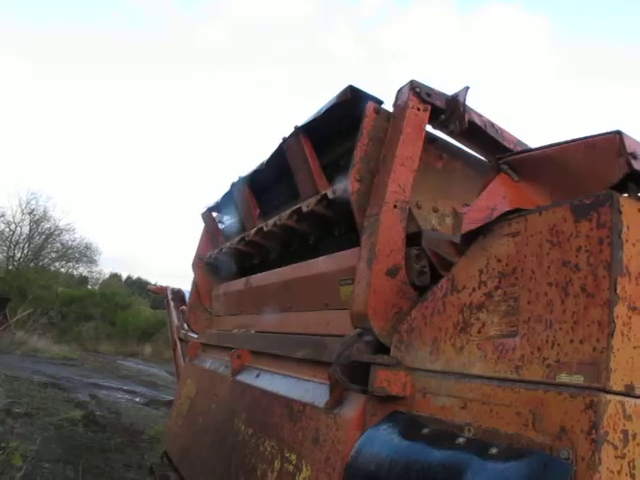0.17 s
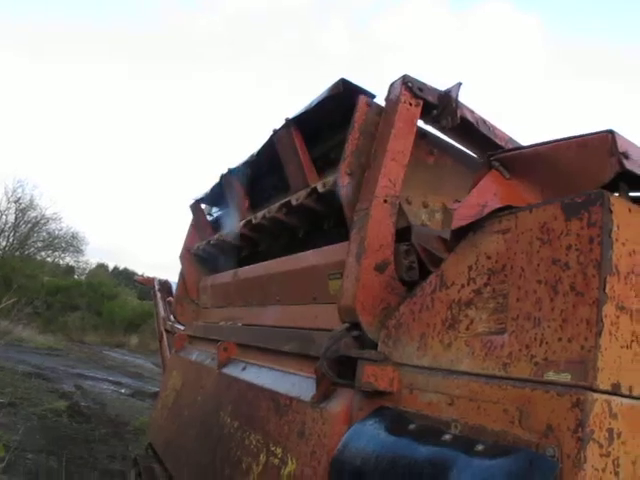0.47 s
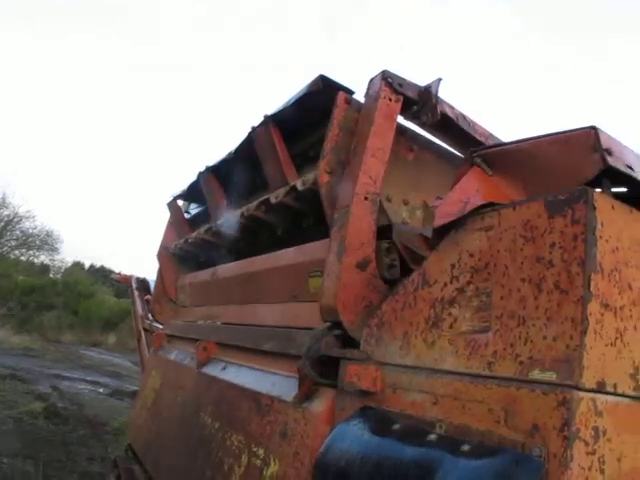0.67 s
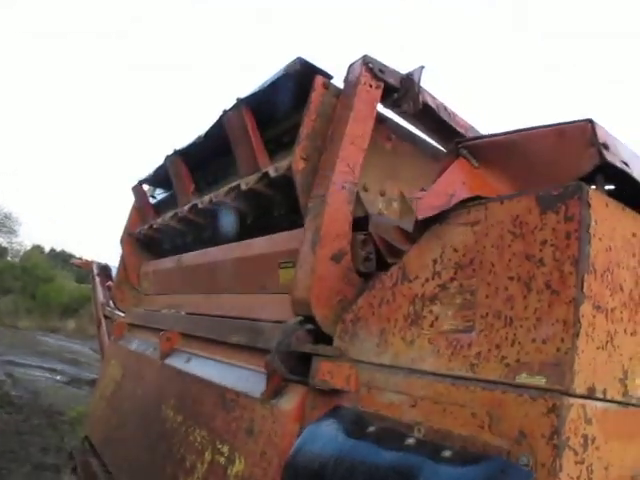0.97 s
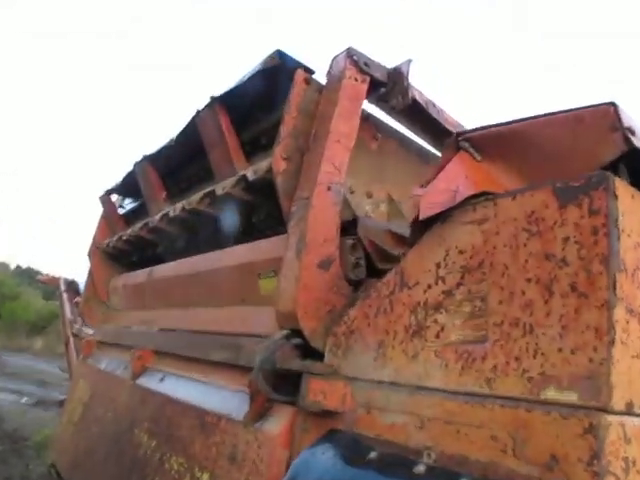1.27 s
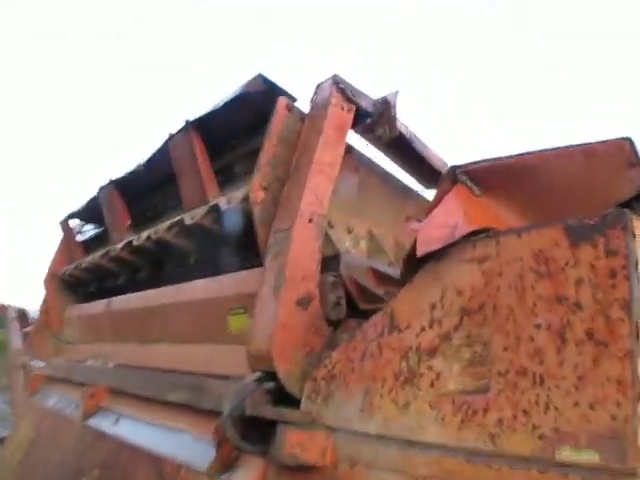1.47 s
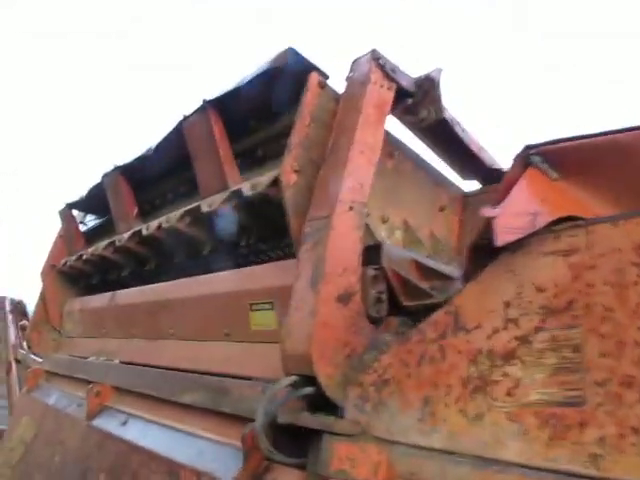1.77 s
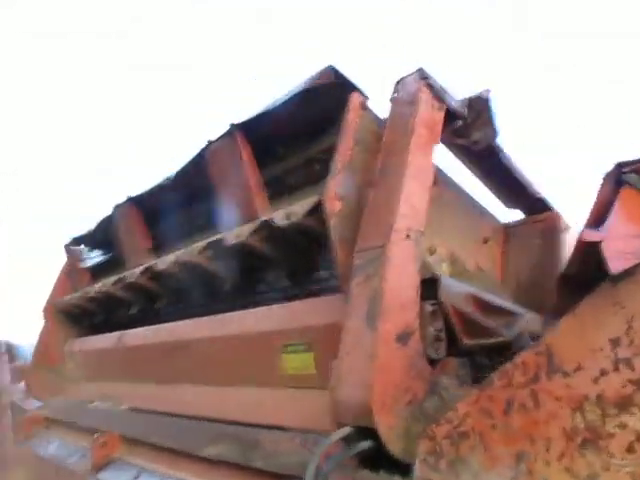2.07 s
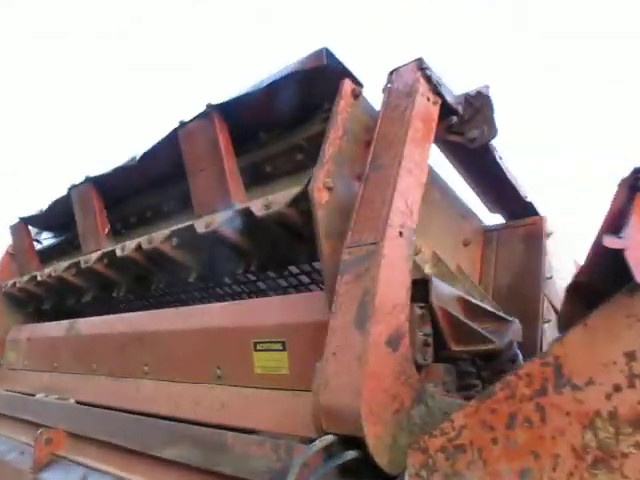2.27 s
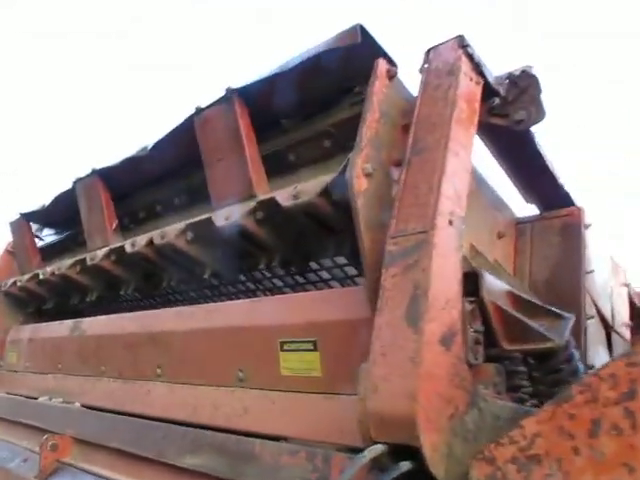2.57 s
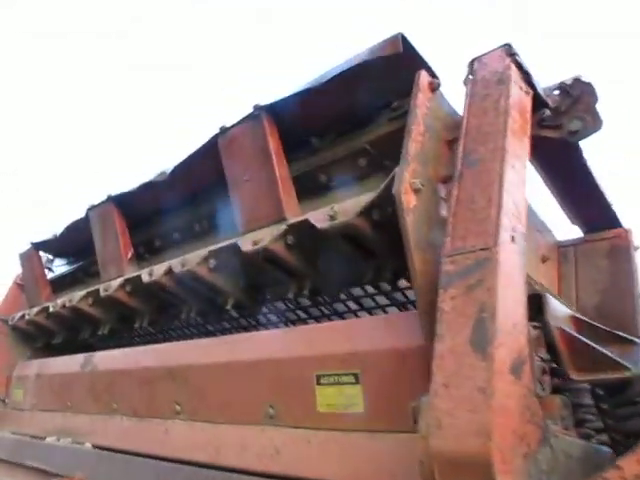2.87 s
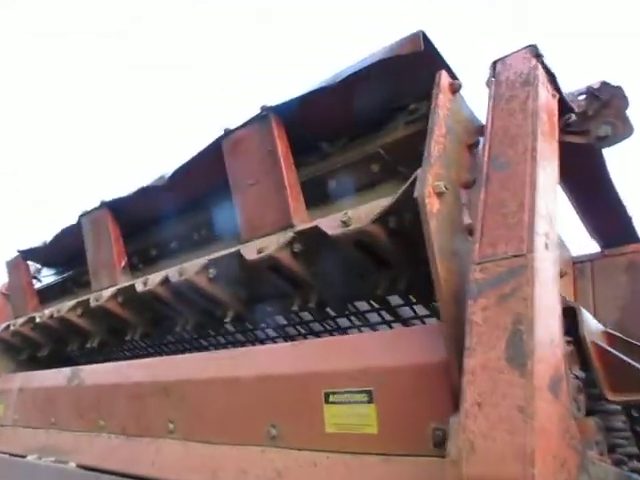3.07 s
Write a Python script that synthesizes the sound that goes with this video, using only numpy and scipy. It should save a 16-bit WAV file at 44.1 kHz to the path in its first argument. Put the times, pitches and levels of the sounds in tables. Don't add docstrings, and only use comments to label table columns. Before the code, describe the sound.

A heavy diesel engine throbs throughout, uneven pulses about sixteen a second under broad casing roar and fan hiss. A click and brief louder burst open it at 0.07 s. Faint dull rattles come until 1.5 s, when the fan eases; from 1.6 s bright mesh-and-frame rattling, about fourteen a second, comes closer, strongest around 2.3-3.2 s, with humming sheets and high metallic pings, sharpest near 2.1, 2.7 and 3.19 s. Dry, open air.

```python
import sys
import numpy as np
from scipy import signal
from scipy.fft import rfft, irfft, next_fast_len
from scipy.io import wavfile
from scipy.ndimage import uniform_filter1d, map_coordinates

SR = 44100
rng = np.random.default_rng(int(sys.argv[2]) if len(sys.argv) > 2 else 0)


def rack_gain(trim_db):
    fader = np.asarray(trim_db, float)
    return 10 ** (fader / 20)


def unload_wav(signal):
    wavfile.write(
        sys.argv[1],
        SR,
        np.round(np.clip(np.atleast_2d(signal).T, -1, 1) * 32767).astype(np.int16),
    )


N = 142002


def unit(x):
    return x / np.sqrt(np.mean(x ** 2) + 1e-20)


def curves(rows):
    s, *cols = np.transpose(rows)
    return [np.interp(np.arange(N) / SR, s, c) for c in cols]


def wobble(rate):
    s = np.arange(0, N + 64, 64)
    knots = rng.standard_normal(300)
    return np.interp(np.arange(N), s, map_coordinates(knots, [s * rate / SR]))


def angle(rates, zero_s):
    turns = np.cumsum(curves(rates)[0]) / SR
    return 2 * np.pi * (turns - turns[round(zero_s * SR)])


def coloured(x, points, lifts=()):
    m = next_fast_len(N + 8192)
    hz = np.fft.rfftfreq(m, 1 / SR)
    f, db = np.transpose(points)
    bells = sum(lift_db / (1 + (2 * (hz - c) / w) ** 2) for c, w, lift_db in lifts)
    response = rack_gain(np.interp(np.log(hz + 1), np.log(f), db) + bells)
    return unit(irfft(rfft(x, m) * response, m)[:N])


def patchy(depth_db):
    z = signal.stft(rng.standard_normal(N), nperseg=512)[2]
    field = rng.standard_normal(z.shape)
    field = uniform_filter1d(uniform_filter1d(field, 8, 0), 8, 1)
    return signal.istft(z * rack_gain(depth_db * unit(field)), nperseg=512)[1][:N]


def narrow(hz, rate):
    a = 2 * np.pi * np.cumsum(hz + np.zeros(N)) / SR
    return unit(wobble(rate) * np.cos(a) + wobble(rate) * np.sin(a))


def struck(rows):
    power = np.zeros(N + SR)
    t = np.arange(SR // 3) / SR
    for s, db, rise, hold, t60 in rows:
        decay = rack_gain(db - 60 * np.maximum(t - hold, 0) / t60)
        power[round(s * SR):][:len(t)] += (decay * (1 - np.exp(-t / rise))) ** 2
    return np.sqrt(power[:N])


def clatter(drive, low_hz, t60):
    rings_per_s = 1400
    start, pitch, size, life = rng.random((4, round(rings_per_s * N / SR)))
    at = (start * N).astype(int)
    t = np.arange(round(.7 * t60 * SR)) / SR
    tones = np.sin(2 * np.pi * (low_hz * 8 ** pitch)[:, None] * t)
    rings = tones * rack_gain(-60 * t / (t60 * (0.21 + life))[:, None])
    rings *= (drive[at] * rack_gain(11 * size ** 4))[:, None]
    return np.bincount((at[:, None] + np.arange(len(t))).ravel(), rings.ravel(), N + len(t))[:N]


# time in seconds, low sheet pitch in Hz, low sheet level in dB,
# high sheet level in dB.
PANELS = [(.1, 818, -39, -50), (.7, 825, -36, -49), (.85, 804, -45, -49), (1.3, 813, -41, -44),
          (1.55, 800, -40, -52), (1.8, 850, -35, -40), (2.0, 848, -50, -46), (2.15, 836, -33, -36),
          (2.5, 840, -42, -41), (2.8, 823, -38, -40), (3.05, 830, -59, -38), (3.2, 830, -55, -38)]


def panels():
    high_hz, sways_per_s = 942, 48
    low_hz, low_db, high_db = curves(PANELS)
    return rack_gain(low_db) * narrow(low_hz, sways_per_s) + rack_gain(high_db) * narrow(high_hz, sways_per_s)


# start in seconds, peak level in dB, singing time in seconds, T60 in seconds.
PIN = [(1.299, -40, .01, .1), (1.33, -43, .035, .08), (1.716, -54, 0.0082, .08), (2.136, -39, .012, .06),
       (2.267, -52, .02, .08), (2.405, -40, .01, .08), (2.577, -42, 0.0086, .06), (2.664, -42, .02, .08),
       (3.077, -31, .006, .06), (1.574, -34, .03, .1), (1.783, -43, .03, .1), (1.865, -35, .005, .14),
       (1.993, -38, 0.052, .1), (2.083, -20.5, 0.0033, 0.02), (2.208, -35, 0.018, .1),
       (2.335, -52, 0.023, .15), (2.491, -47, .01, .1), (2.596, -41, 0.0081, .1),
       (2.692, -23.5, 0.0078, 0.12), (2.844, -45, .01, .1), (2.923, -28, 0.008, 0.05),
       (2.94, -37, .02, .06), (3.047, -29.5, 0.09, 0.04), (3.139, -26, .005, 0.037),
       (3.187, -19.5, 0.0054, 0.16)]
# start in seconds, pitch in Hz, peak level in dB, T60 in seconds.
PINGS = [(.45, 7250, -38, .1), (.46, 8800, -41, 0.086), (.61, 8940, -43, .08), (.705, 4630, -42, .06),
         (1.12, 8800, -40, .06), (1.33, 9920, -45, 0.11), (1.782, 4700, -32, .03), (1.778, 10100, -59, .1),
         (1.053, 8850, -43, .05), (1.268, 8800, -44, .06), (1.276, 7700, -43, .06), (1.492, 8800, -46, .04),
         (1.562, 8900, -45, 0.061), (1.575, 7700, -48, .05), (1.702, 8800, -50, 0.062),
         (2.058, 11200, -43, 0.067), (2.424, 8700, -46, 0.06), (2.487, 8800, -46, .06),
         (2.545, 8800, -47, .06), (2.548, 11200, -52, .06), (2.596, 9920, -48, .12),
         (2.703, 3710, -28, 0.085), (2.838, 3470, -36, .06), (1.923, 3210, -28, .06),
         (2.232, 3380, -29, .04), (1.918, 8750, -42, 0.072), (1.995, 7700, -42, .1),
         (2.085, 4560, -31, 0.044), (2.697, 8900, -38, 0.042), (2.825, 10900, -48, .06),
         (2.867, 7700, -40, .07), (2.93, 14240, -67, .2), (3.082, 9800, -49, .1), (3.162, 8850, -43, 0.068),
         (3.188, 9920, -31.5, 0.037), (3.188, 11100, -45, .08), (3.188, 7700, -41, 0.068),
         (3.188, 14240, -56, .15)]
PITCH_DRIFT = .75


def small_parts():
    pin_hz, hum_db = 5941, -54
    t = np.arange(N) / SR
    near_db = curves(WALK)[4]
    sings = struck([(s, db - 5.5, .0007, hold, t60) for s, db, hold, t60 in PIN])
    sings += rack_gain(hum_db + near_db + 7.4 * wobble(25))
    drift = PITCH_DRIFT * (wobble(30.03) + wobble(90))
    pin = sings * rack_gain(3.5 * np.tanh(wobble(90))) * np.sin(2 * np.pi * pin_hz * t + drift)
    pin += sings * rack_gain(-17) * narrow(pin_hz, 90)
    cracks = struck([(s, db - 7, .0007, 0, .04) for s, db, hold, t60 in PIN])
    cracks = cracks * coloured(rng.standard_normal(N), MESH)
    pings = sum(struck([(s, db, .001, .005, t60)]) * np.sin(2 * np.pi * hz * t + PITCH_DRIFT * wobble(90))
                for s, hz, db, t60 in PINGS)
    return pin + cracks + pings


# time in seconds, throws per second.
SHAKE = [(.1, 13.4), (.7, 13.5), (1.65, 14), (2.5, 14.3), (3.2, 14.4)]
# multiple of the throw rate, level in dB rms.
SHAKE_ORDERS = [(1, -31), (2, -47), (3, -41), (4, -42)]


def box_pump():
    near_db = curves(WALK)[4]
    a = angle(SHAKE, zero_s=1.63)
    return sum(rack_gain(db + 3 + .3 * k * near_db + .3 * k * wobble(1.5)) * np.cos(k * a) for k, db in SHAKE_ORDERS)


# start in seconds, peak level in dB.
FAR_RATTLES = [(0.2433, -31.5), (0.3277, -30), (0.4094, -26), (0.5654, -30), (0.6154, -29.5), (0.6914, -27),
               (0.7744, -33), (0.9144, -27), (1.0524, -31), (1.2052, -30.5), (1.2744, -31), (1.3494, -28.5),
               (1.4194, -29), (1.4934, -26.5), (1.5484, -29.5)]
# start in seconds, peak level in dB, frame level over it in dB.
RATTLES = [(1.6344, -34, 5.5), (1.7037, -32, 1), (1.7381, -32.5, -13), (1.7743, -30, 4.5),
           (1.844, -29, 4.5), (1.9198, -29.5, -8), (1.987, -32.5, 9.5), (2.0572, -29, 5),
           (2.1256, -27.5, -1), (2.195, -30, 0.5), (2.267, -29, -0.5), (2.3359, -29, 3.5), (2.4037, -28, 0),
           (2.4435, -52, -2), (2.4797, -31, 7), (2.545, -31.5, 4.5), (2.6124, -36, 7), (2.657, -32.5, -7),
           (2.6905, -29, 4.5), (2.7533, -31.5, -2), (2.8235, -32, 8), (2.893, -32.5, 11),
           (2.9673, -29.5, 1.5), (3.031, -27, 1), (3.106, -29.5, 0), (3.138, -46, 0), (3.1705, -31, 5.5)]
# start in seconds, peak level in dB.
TAPS = [(1.1765, -38), (1.6785, -37), (1.8182, -41), (2.0276, -36), (2.2403, -35), (2.3076, -37),
        (2.4978, -36), (2.52, -33), (2.8718, -37), (2.9203, -35), (3.003, -36)]
# frequency in Hz, density in dB per Hz.
MESH = [(1500, -40), (3500, 6), (5000, 4.5), (8000, -3), (10500, -4.5), (12500, -26), (16000, -43)]
# frequency in Hz, density in dB per Hz.
FRAME = [(500, -29), (1200, -4.5), (2000, -2), (3200, -6), (4500, -13.5), (7000, -61)]


def rattles():
    mesh_db, frame_lag_s = -5.5, 0.0088
    near_db = curves(WALK)[4]
    hits = [(s, db - 5.5, 5) for s, db in FAR_RATTLES] + list(RATTLES)
    blows = [(s, db + mesh_db, 0.002, .006, 0.13) for s, db, frame_db in hits]
    snaps = [(s, db - 3, .0004, .001, 0.017) for s, db, frame_db in RATTLES]
    taps = [(s, db + mesh_db, .0006, .004, 0.05) for s, db in TAPS]
    mesh = struck(blows + snaps + taps)
    frame = struck([(s + frame_lag_s, db + frame_db - 1, 0.0052, .012, 0.12) for s, db, frame_db in hits])

    grit = patchy(depth_db=1.5) * rack_gain(2.3 * unit(uniform_filter1d(rng.standard_normal(N), size=40)))
    wires = clatter(unit(mesh) + 0.46 * rack_gain(.5 * near_db), low_hz=1516, t60=.012)
    wires = coloured(wires, [(1200, -27), (2500, -4.5), (6000, -3.0), (11000, -17.5), (16000, -40)])
    knocks = clatter(unit(frame) + 1.8, low_hz=448.3, t60=.06)
    ringing = mesh * coloured(grit, MESH) + frame * coloured(patchy(depth_db=-0.5), FRAME)
    return ringing + rack_gain(-37) * unit(knocks) + rack_gain(-46.5) * wires


# frequency in Hz, density in dB per Hz.
ROAR = [(30, -8), (50, -8), (80, -17), (150, -8.5), (240, -8.5), (380, -11), (900, -14.5), (2000, -16.5)]
# centre in Hz, width in Hz, lift in dB.
CASING = [(294, 14, 4), (458, 32, 2), (816, 79, 4), (946, 54, 4), (1990, 760, 1), (2890, 30, 4.5)]
# frequency in Hz, density in dB per Hz.
HISS = [(1200, -17), (2800, 0), (4000, -6), (6000, -10.5), (10000, -17), (12000, -26), (14500, -42),
        (16000, -56)]


def casing_and_fan():
    _, _, roar_db, fan_db, _ = curves(WALK)
    a = angle(CYCLE, STRONG_FIRING_S)
    swing_db = 0.49 * wobble(5.17) + .5 * wobble(24.99) + 0.53 * np.cos(4 * a) + 0.28 * np.cos(a)
    roar = coloured(patchy(depth_db=0.5), list(ROAR) + [(4500, -36.5), (9000, -64)], CASING)
    hiss = coloured(patchy(depth_db=0.53), [(300, -60)] + list(HISS), CASING)
    hiss_db = -34.5 + fan_db + 0.99 * wobble(17.0)
    return rack_gain(swing_db) * (rack_gain(-24.5 + roar_db) * roar + rack_gain(hiss_db) * hiss)


# time in seconds, cycles per second.
CYCLE = [(.1, 16.54), (.6, 16.65), (.85, 16.73), (1.08, 16.46), (1.25, 16.31), (1.5, 16.46), (3.2, 16.46)]
STRONG_FIRING_S = 1.6222
# multiple of the cycle rate, level in dB rms, unsteadiness in dB.
EXHAUST = [(2, -43, 2), (4, -27, .4), (6, -44, 1.5), (7, -46, 2), (8, -26, .8), (9, -33, 1.4),
           (10, -29, 1.5), (11, -36, 1.5), (12, -41, 2), (13, -44, 2), (14, -41, 1.5), (15, -40, 1.2),
           (20, -45, 2), (22, -45, 2), (24, -44, 2), (28, -45, 2), (30, -46, 2)]
# time in seconds, firing note in dB, pipe note in dB, casing roar in dB,
# fan in dB, screen nearness in dB.
WALK = [
    (.1, 1, 0.5, 1, 1, -19),
    (.5, 1, 0, 0.5, 0, -14),
    (.85, 0, 2, 0.5, 1, -16),
    (1.1, 1, 0.5, 0.5, 0.5, -19),
    (1.5, 1, 1.5, -0.5, -3, -19),
    (1.9, 0.5, 0, 0.5, -2.5, -12),
    (2.3, -2, -1.5, -1, -2.5, 1),
    (2.8, -3, -1, 2, -3.5, 3.5),
    (3.2, -3, -2, 0.5, -0.5, 1.5),
]
# time in seconds, level in dB.
UNEVEN = [(.1, -6), (1.2, -0.5), (1.5, -2), (2.4, 4), (2.85, 2), (3.2, 1)]


def exhaust():
    pipe_order, pipe_width, pipe_turn = 10.7, .9, 2.0
    firing_db, pipe_db, *_ = curves(WALK)
    uneven_db, = curves(UNEVEN)
    a = angle(CYCLE, STRONG_FIRING_S)
    notes = np.zeros(N)
    for k, db, loose_db in EXHAUST:
        level_db = db + 3 + (firing_db if k == 4 else pipe_db)
        level_db = level_db + (k in (9, 12, 13)) * uneven_db + loose_db * np.tanh(wobble(4))
        off = pipe_order - k
        phase = pipe_turn * pipe_width * off / (pipe_width ** 2 + off ** 2)
        phase = phase + 0.21 * loose_db * wobble(2.8) + (k > 15) * rng.uniform(0, 7.4)
        notes -= rack_gain(level_db) * np.cos(k * a + phase)
    return notes


def scene():
    return (panels() + small_parts() + box_pump() + rattles() + casing_and_fan() + exhaust())[None]


def low_pass(x):
    return signal.sosfilt(signal.butter(12, 16500, fs=SR, output="sos"), x)


def record(dry):
    start_s, settle_db, settle_s, top_hz = .0723, 5.5, 0.049, 15250
    t = np.arange(N) / SR - start_s
    x = dry * (t > 0) * rack_gain(settle_db * np.exp(-np.abs(t) / settle_s))
    x = signal.sosfilt(signal.ellip(10, .5, 40, top_hz, fs=SR, output="sos"), x)
    click = (t > 0) * rack_gain(-24 - 60 * np.abs(t) / 0.0022) * rng.standard_normal(N)
    jolt = (t > 0) * rack_gain(-16.5 - 60 * np.abs(t) / 0.028) * coloured(rng.standard_normal(N), FRAME)
    return low_pass(x + click + jolt)


dry = scene()
out = record(dry)
unload_wav(out)
```